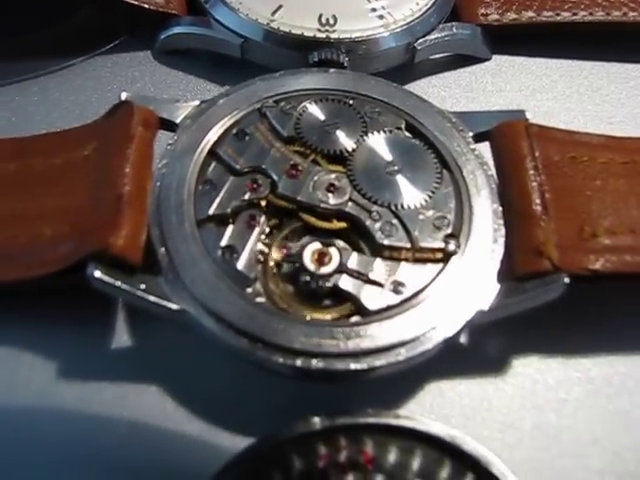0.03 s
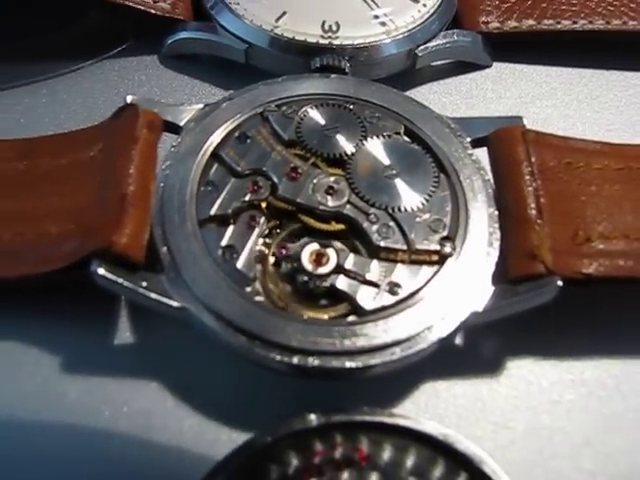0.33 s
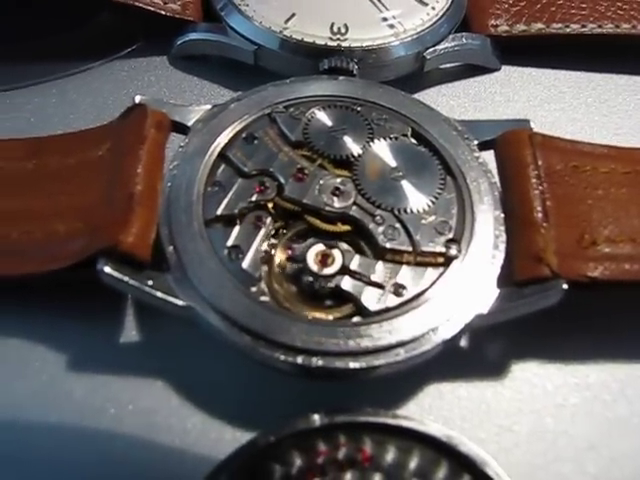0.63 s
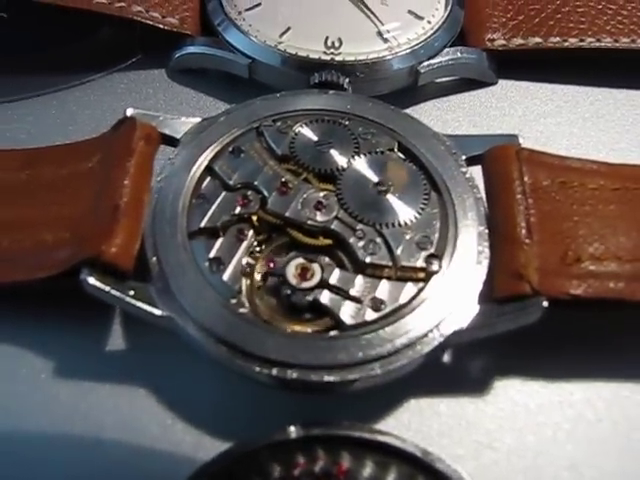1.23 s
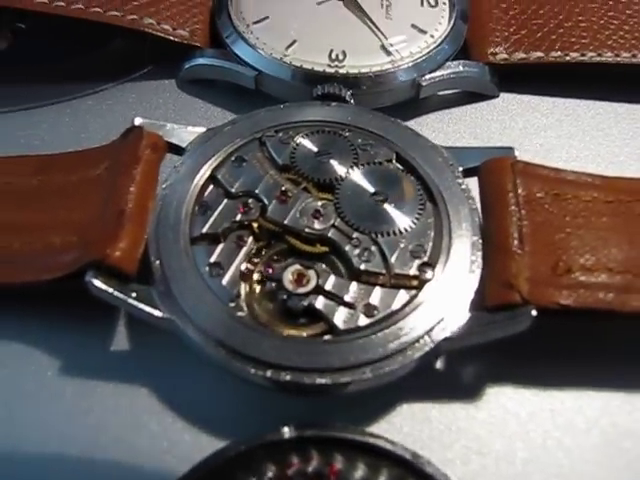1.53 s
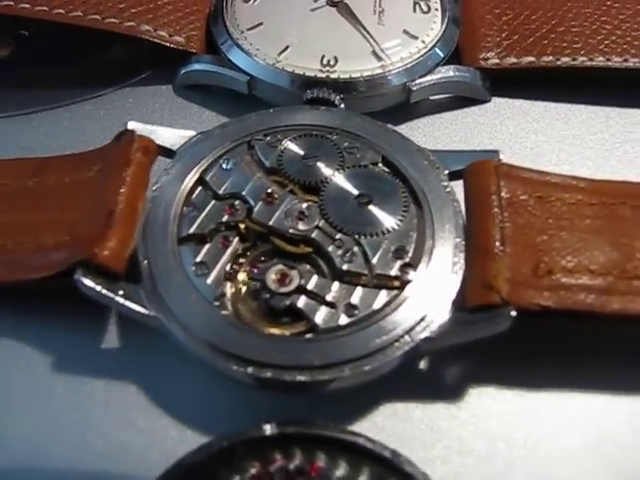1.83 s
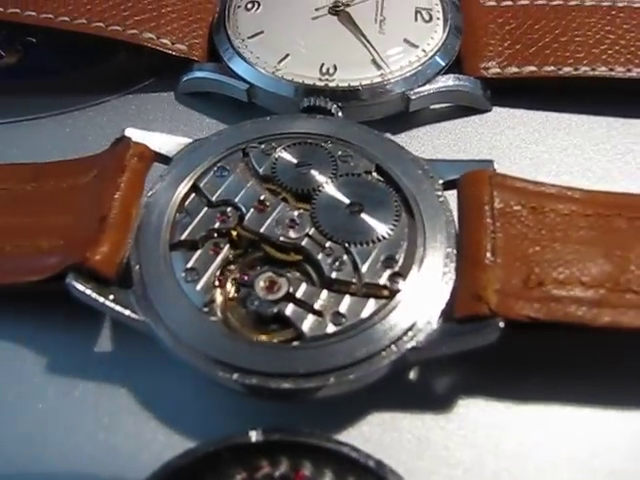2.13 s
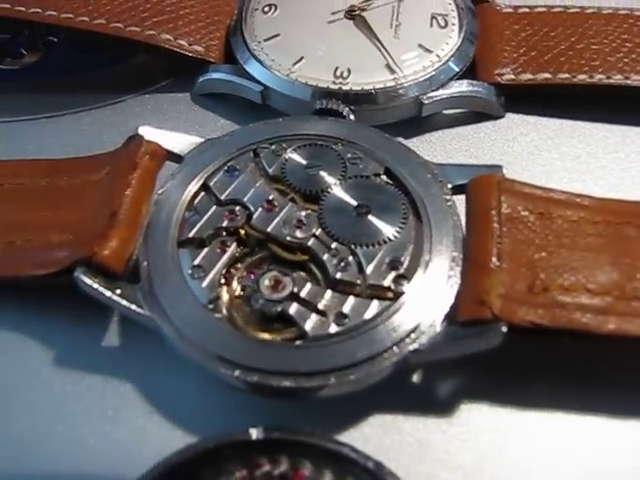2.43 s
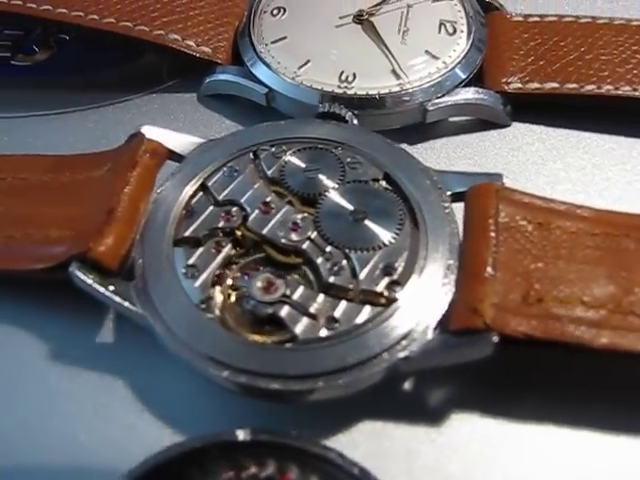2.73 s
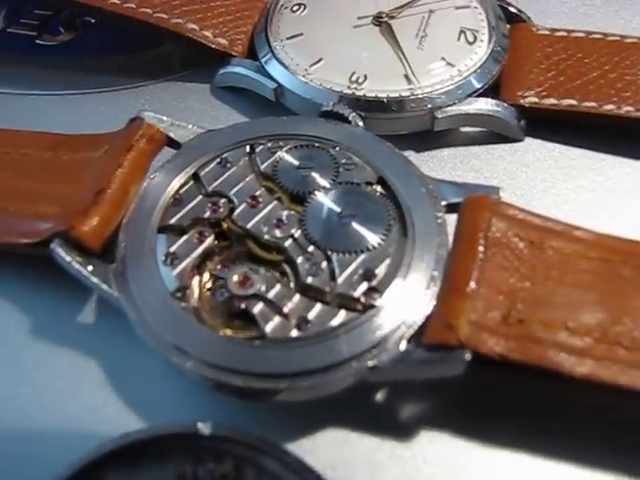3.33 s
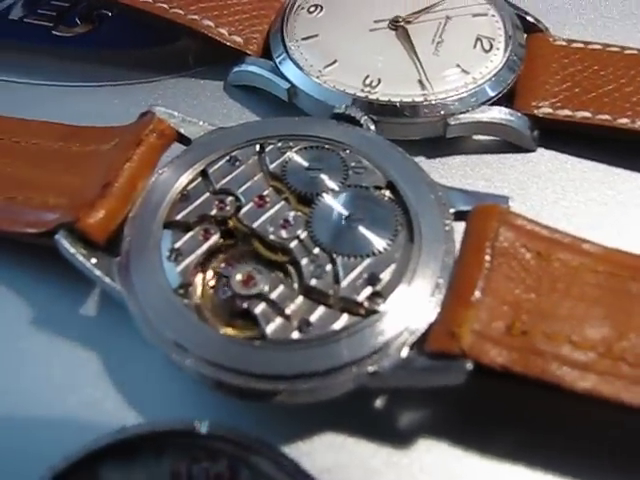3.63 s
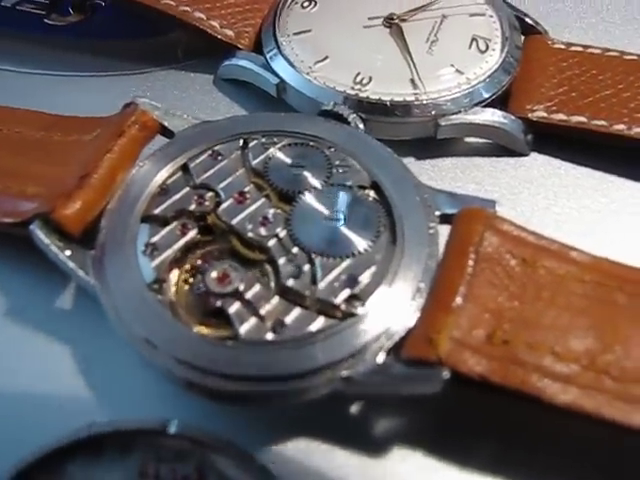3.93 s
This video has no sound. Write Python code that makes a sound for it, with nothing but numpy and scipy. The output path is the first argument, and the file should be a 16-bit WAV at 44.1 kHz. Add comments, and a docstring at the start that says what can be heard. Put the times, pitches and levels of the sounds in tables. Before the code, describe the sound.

A mechanical watch ticks faintly and evenly over steady hiss and low room rumble.

```python
"""An open mechanical watch ticks five times a second, close to a hand-held camera in a quiet room.
Each beat is three tiny escapement impacts that ring the steel movement. The hand on the camera adds
soft bumps, two housing clicks and faint creaks. Behind them: room rumble and hum, the camera's thin
whine and motor tones, and microphone hiss."""
import sys
import numpy as np
from scipy import signal
from scipy.fft import rfft, irfft
from scipy.io import wavfile

SR = 44100
rng = np.random.default_rng(int(sys.argv[2]) if len(sys.argv) > 2 else 0)


def generate_wav(sig):
    """Save sig (samples, or channels by samples) to the path in sys.argv[1] as 16-bit PCM at SR."""
    pcm = np.round(np.clip(np.atleast_2d(sig).T, -1, 1) * 32767).astype(np.int16)
    wavfile.write(sys.argv[1], SR, pcm)


N = 176400
RUMBLE_PAN_DB = 1.24  # room and bumps


def watch(t):
    """The pallets strike three times a beat; each rattle rings the movement and dies away in the case."""
    # level_db per beat, tick and tock alternating
    beat_levels_db = [5, 2, 3.5, 2, 6, 2, 1, 0, 5, -1, 0.5, 2, 3, 0, 0, 0, 1, -1, 1, -1]
    # lead_s before the drop: unlocking, impulse, drop on the banking
    leads_s = [.0133, .008, 0]
    # same impacts: level_db, decay_s
    impacts = [(-11, .0012), (-14, .0012), (-3.5, 0.0011)]
    # modes of the movement: pitch_hz
    modes_hz = [6280, 8330, 11200, 13000, 13650, 14870]
    # same modes: width_hz, gain_db
    mode_shapes = [(250, 4), (324, 10), (500, 1.5), (300, 7), (450, 3), (550, 5)]
    first_s, beat_s, tock_early_s = .0202, .2, .0004
    case_db, case_decay_s = -23, .011
    gain_db, crack_db, side_gain = -46.5, -12, .6
    force = np.zeros(N)
    for k, beat_db in enumerate(beat_levels_db):
        drop_s = first_s + k * beat_s - k % 2 * tock_early_s
        near = np.abs(t - drop_s) < beat_s / 2
        age_s = t[near] - drop_s
        blows = sum(undb(db) * decay(age_s + lead_s, decay_s)
                    for lead_s, (db, decay_s) in zip(leads_s, impacts))
        force[near] += undb(beat_db) * (blows + undb(case_db) * decay(age_s, case_decay_s))
    mid, side = rng.choice([-1, 1], (2, N))
    rattle = force * (mid + side_gain * side * np.array([[1], [-1]]))
    f = np.arange(N // 2 + 1) * SR / N
    body = sum(undb(db) * resonance(f, hz, width_hz) for hz, (width_hz, db) in zip(modes_hz, mode_shapes))
    crack = undb(crack_db) * resonance(f, hz=8100, width_hz=9000)
    return irfft(rfft(rattle) * (body + crack), N) * undb(gain_db) * pan(left_db=-1)


def hand_bumps(t):
    """The hand sets off low, wavering shudders of the camera."""
    # centre_s, length_s, level_db, pitch_hz
    bumps = [(0.25, 0.061, -40, 47.9), (1.826, 0.042, -38.5, 55.3), (2.464, 0.11, -35.5, 41.04),
             (2.858, 0.041, -35.5, 47.9), (3.051, 0.076, -44.5, 128.4), (3.563, 0.26, -38, 39.97),
             (3.846, 0.091, -39.5, 40.96), (3.995, 0.08, -36.5, 41)]
    wavering_s = np.cumsum(1 + .049 * walk(rate_hz=9.2)) / SR
    shudder = sum(swell(t, centre_s, length_s, db) * np.sin(2 * np.pi * hz * wavering_s)
                  for centre_s, length_s, db, hz in bumps)
    return np.sqrt(2) * shudder * pan(RUMBLE_PAN_DB)


def housing_clicks(t):
    """The plastic housing slips twice per click and rings briefly."""
    # start_s, level_db
    clicks = [(2.8716, -43.5), (3.542, -38.5)]
    # housing modes: pitch_hz, decay_s, gain_db
    modes = [(960, .0018, -3), (1265, 0.0023, 1), (1800, .0015, -12), (2190, 0.0016, -11)]
    rise_s, slip_gap_s = .0005, .001415

    def ring(age_s):
        tones = sum(undb(db) * decay(age_s, decay_s) * np.sin(2 * np.pi * hz * age_s)
                    for hz, decay_s, db in modes)
        return (1 - decay(age_s, rise_s)) * tones

    slips = sum(undb(db) * (ring(t - start_s) + ring(t - start_s - slip_gap_s)) for start_s, db in clicks)
    return slips * pan(left_db=7)


def grip(t):
    """Fingers creak and rustle faintly on the camera."""
    # centre_s, length_s, level_db
    creaks = [(1.5, 0.0055, -60), (1.728, 0.0065, -55.5), (1.992, 0.0054, -57), (2.187, .025, -68),
              (2.333, 0.0076, -64), (2.404, 0.0097, -59), (3.125, 0.0055, -60), (3.339, .012, -55.5),
              (3.824, 0.0066, -56)]
    # freq_hz, density_db
    spectrum = [(600, -13.5), (1300, -7), (2100, -10), (3200, -14), (5000, -30), (12000, -24)]
    rustle_start_s, rustle_db, spread_db = 1.2, -76, 7.5
    rustle = (t > rustle_start_s) * undb(rustle_db + spread_db * walk(rate_hz=14))
    creaking = sum(swell(t, centre_s, length_s, db) for centre_s, length_s, db in creaks)
    rub = np.array([coloured(spectrum), coloured(spectrum)]) + coloured(spectrum)
    return (creaking + rustle) * rub / np.sqrt(2)


def room(t):
    """Rumble slowly grows and rings the room, over the hum; the bass is alike in both ears."""
    # rumble common to both ears: freq_hz, density_db
    mid_spectrum = [(20, -11), (32, -12), (42, 2), (58, -5.5), (75, -8.5), (100, -13), (140, -16.5),
                    (190, -18.5), (330, -24.5), (420, -27), (510, -29), (750, -30), (1000, -35.5),
                    (1400, -38), (2500, -52.5), (6000, -56)]
    # left-right difference: freq_hz, density_db
    side_spectrum = [(20, -5), (50, 0), (110, -4), (250, -49), (550, -33), (660, -7), (740, -11),
                     (820, -7.5), (980, -19), (1300, -17), (1750, -25), (6000, -34.5)]
    # room resonances: pitch_hz, width_hz, level_db
    modes = [(160.6, 5.3, -61.5), (199, 8.9, -60.5), (231.2, 4.9, -66.5), (276, 15.5, -64.5),
             (395, 40, -67), (1198, 220, -74.5)]
    # low-mid band edges: low_hz, high_hz
    band_hz = (109, 282)
    # slow swing of that band: time_s, gain_db
    band_curve = [(0, -3), (.75, -2.5), (1.2, 0.5), (1.85, 1), (2.4, 0), (3.08, 2.5), (3.3, 0), (4, 2)]
    mid_db, side_db, rise_db_per_s = -44.5, -64.5, .72
    rise = undb(rise_db_per_s * (t - t.mean()))
    ringing = sum(undb(db) * noise(lambda f: np.abs(resonance(f, hz, 2 * width_hz)) ** 3)
                  for hz, width_hz, db in modes)
    mid = (undb(mid_db) * coloured(mid_spectrum) + ringing) * rise + hum()
    band = signal.sosfiltfilt(signal.butter(2, band_hz, "band", fs=SR, output="sos"), mid)
    band_gain = undb(np.interp(t, *np.array(band_curve).T))
    mid += band * (band_gain - 1)
    side = undb(side_db) * coloured(side_spectrum) * rise
    return mid * pan(RUMBLE_PAN_DB) + side * np.array([[1], [-1]])


def hum():
    """Two low hums in the room waver in pitch and level."""
    # pitch_hz, level_db
    tones = [(60, -48), (124, -54.5)]
    wander_hz, waver_db = 2.8, 1.7
    total = np.zeros(N)
    for hz, db in tones:
        cycles = np.cumsum(hz + wander_hz * walk(rate_hz=7)) / SR
        level = undb(db + waver_db * walk(rate_hz=2.64))
        total += np.sqrt(2) * level * np.sin(2 * np.pi * cycles)
    return total


def camera_whine(t):
    """A thin electrical tone flips polarity each picture frame and is louder in its second half."""
    # rows left, right: first_half_db, second_half_db
    levels_db = [(-63, -57), (-64, -62.5)]
    pitch_hz, frame_hz, frame_start_s = 7867.1, 29.97, .0307
    frames = (t - frame_start_s) * frame_hz
    gains = undb(levels_db)
    level = np.where(frames % 1 < .5, gains[:, :1], gains[:, 1:])
    polarity = 1 - 2 * (np.floor(frames) % 2)
    return np.sqrt(2) * level * polarity * np.sin(2 * np.pi * pitch_hz * t)


def camera_motor(t):
    """A small motor gives faint steady tones."""
    # pitch_hz, rms_db
    tones = [(635.5, -71.5), (1790, -85.5), (1905, -83), (1969, -79.5), (2025, -80), (2790, -85),
             (2951, -82.5)]
    return np.sqrt(2) * sum(undb(db) * np.sin(2 * np.pi * (hz * t + rng.random())) for hz, db in tones)


def hiss():
    """Steady microphone hiss, mostly unrelated left and right."""
    # freq_hz, density_db
    spectrum = [(200, 11.5), (1000, 0), (2200, 0), (4000, -2.5), (7000, -5), (10000, -8), (13000, -11.5),
                (15700, -17.5)]
    level_db, correlation = -55.5, .12
    separate = np.array([coloured(spectrum), coloured(spectrum)])
    return undb(level_db) * (np.sqrt(correlation) * coloured(spectrum) + np.sqrt(1 - correlation) * separate)


def undb(db):
    """Decibels to gain."""
    return 10 ** (np.asarray(db) / 20)


def pan(left_db):
    """Stereo gains, left louder than right by left_db."""
    return undb(np.array([[left_db], [-left_db]]) / 2)


def noise(gain):
    """Unit-rms noise shaped by gain(freq_hz)."""
    f = np.arange(N // 2 + 1) * SR / N + 1e-6
    x = irfft(rfft(rng.standard_normal(N)) * gain(f), N)
    return x / x.std()


def coloured(points):
    """Unit-rms noise through (freq_hz, density_db) points, rolled off below the first."""
    hz, db = np.array(points).T
    return noise(lambda f: undb(np.interp(np.log(f), np.log(hz), db)) * np.minimum(f / hz[0], 1) ** 2)


def walk(rate_hz):
    """Slow random motion, unit spread."""
    return noise(lambda f: 1 / (1 + (f / rate_hz) ** 4))


def resonance(f, hz, width_hz):
    """Response of one mode, gain 1 at its centre."""
    return 1j * f * width_hz / (hz ** 2 - f ** 2 + 1j * f * width_hz)


def decay(age_s, decay_s):
    """Exponential fall from age zero, silent before."""
    return (age_s >= 0) * np.exp(-np.abs(age_s) / decay_s)


def swell(t, centre_s, length_s, db):
    """Gaussian rise and fall."""
    return undb(db) * np.exp(-2 * ((t - centre_s) / length_s) ** 2)


def scene():
    """The watch, the background and the hand's noises, in stereo."""
    t = np.arange(N) / SR
    ticks = watch(t)
    background = camera_whine(t) + camera_motor(t) + room(t) + hiss()
    return ticks + background + hand_bumps(t) + housing_clicks(t) + grip(t)


def record(dry):
    """A steep linear-phase low-pass cuts the top without smearing the ticks."""
    cutoff_hz = 15780
    taps = signal.firwin(601, cutoff_hz, fs=SR)
    return signal.fftconvolve(dry, taps[None], mode="same")


dry = scene()
out = record(dry)
generate_wav(out)
```